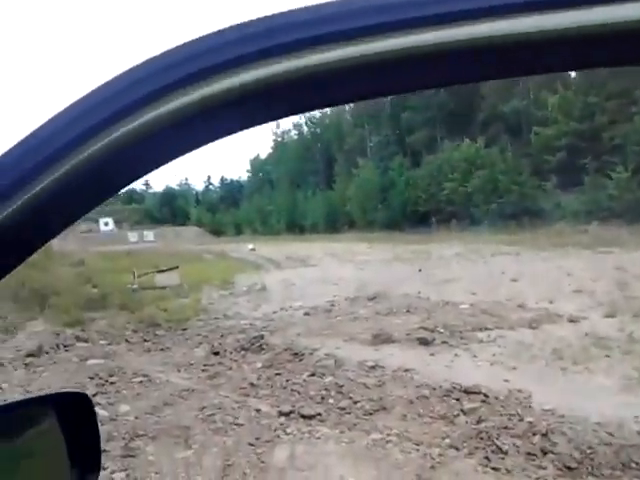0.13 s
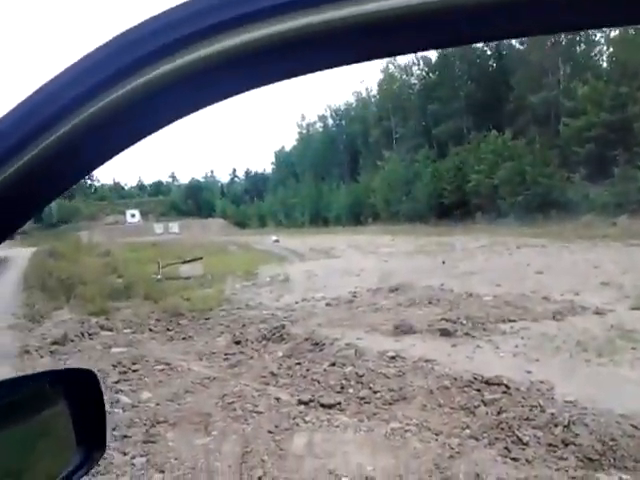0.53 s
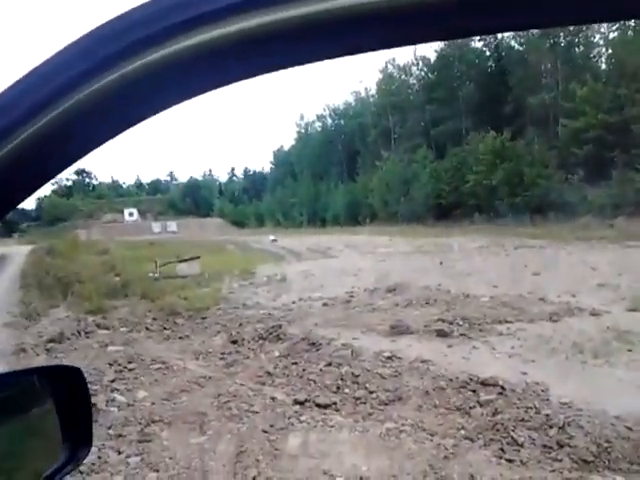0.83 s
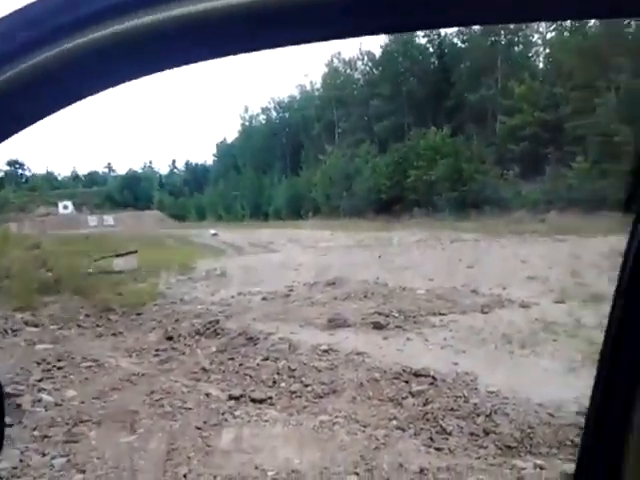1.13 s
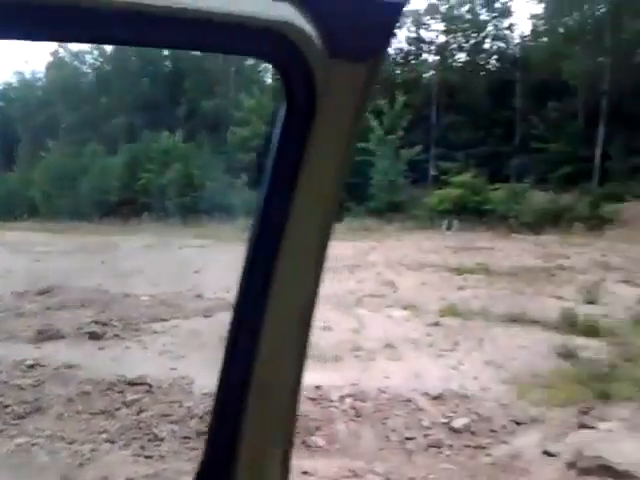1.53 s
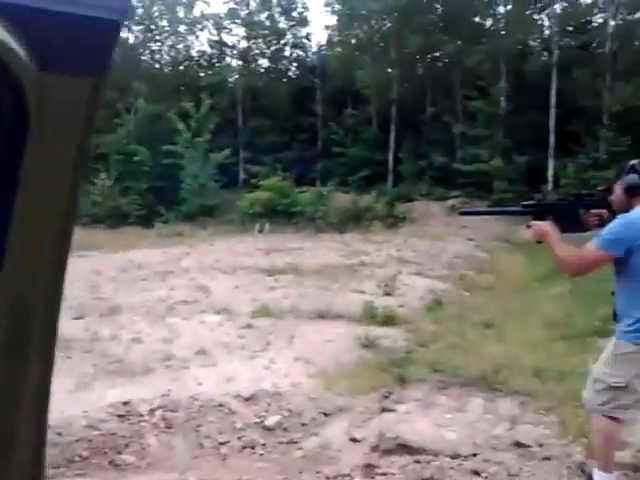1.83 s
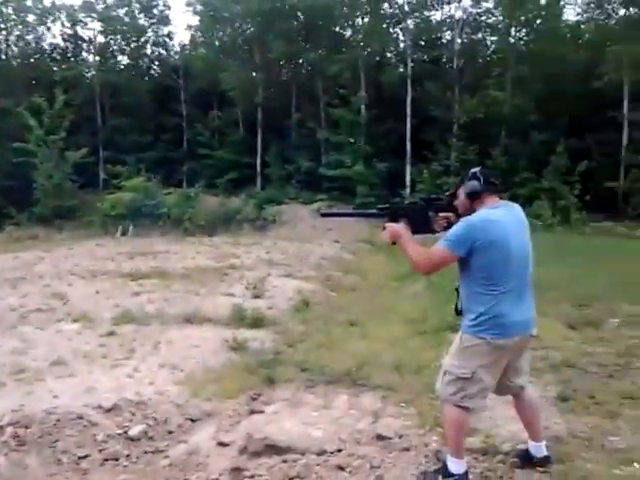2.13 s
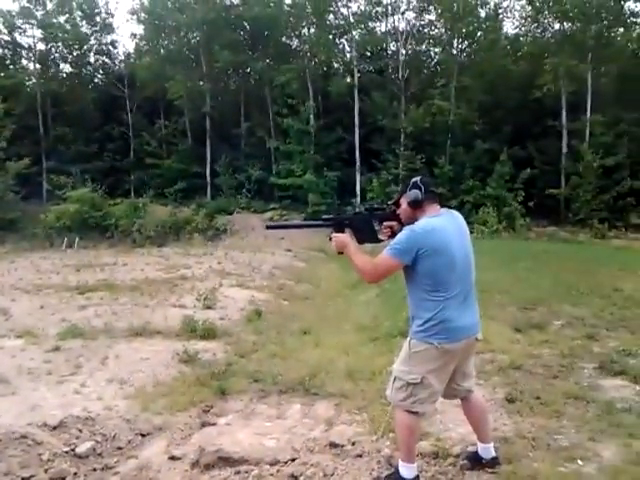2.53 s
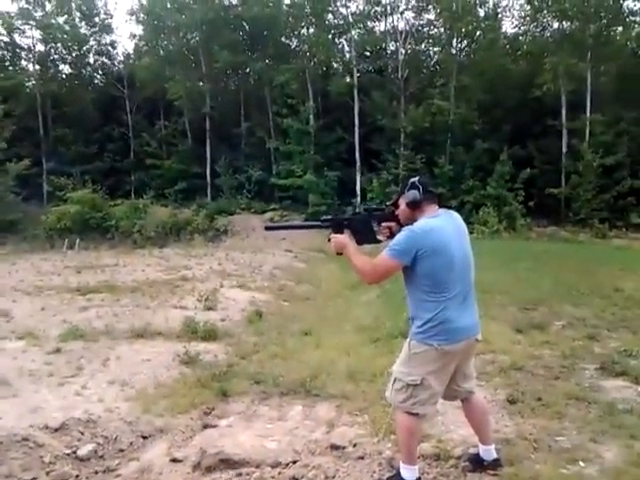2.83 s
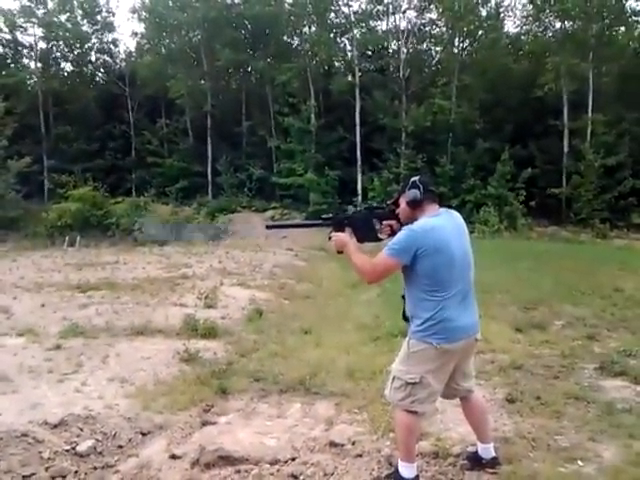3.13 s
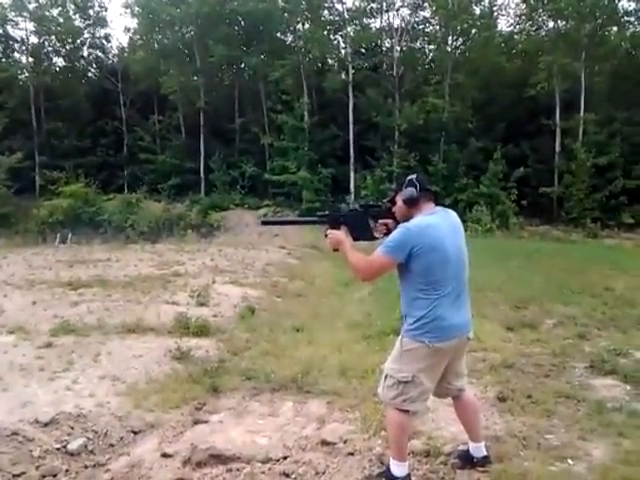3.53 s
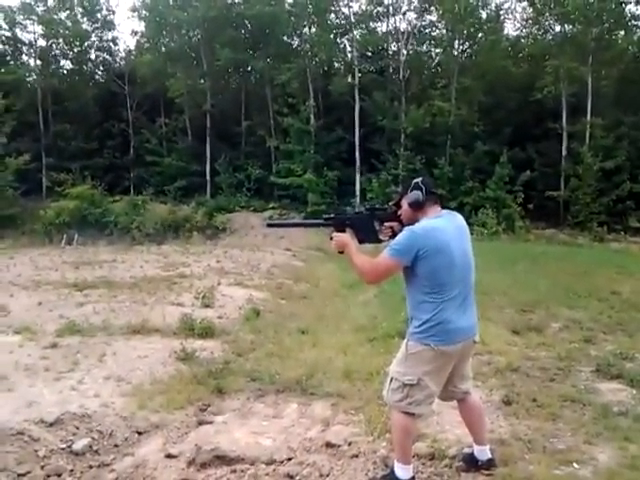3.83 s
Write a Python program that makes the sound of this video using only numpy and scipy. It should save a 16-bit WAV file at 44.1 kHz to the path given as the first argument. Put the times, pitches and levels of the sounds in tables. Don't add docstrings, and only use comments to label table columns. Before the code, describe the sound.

Rifle shots at an outdoor range ringed by forest, close to a small mono microphone. The tail of an earlier shot claps off trees and fades from 0 s. From about 0.4 to 1.8 s, faint plastic ticks, a sliding rub, soft bumps and cloth rustle over hiss. Clipped, metallic-ringing blasts hit at 2.0 and, strongest, 3.2 s, with clattering, rolling echoes. A very faint insect whistles near 1.8 and 3.0 s.

```python
import sys
import numpy as np
from scipy import signal
from scipy.fft import rfft, irfft
from scipy.io import wavfile
from scipy.ndimage import uniform_filter1d

SR = 44100
rng = np.random.default_rng(int(sys.argv[2]) if len(sys.argv) > 2 else 0)


def waveform_to_disk(signal):
    frames = np.transpose(np.atleast_2d(signal))
    scaled = np.clip(frames, -1, 1) * 32767
    samples = np.round(scaled).astype(np.int16)
    wavfile.write(sys.argv[1], SR, samples)


def field_ratio(decibels):
    return 10 ** (np.asarray(decibels, dtype=float) / 20)


N = 176400
ECHO_N = 2 * SR


def even(x):
    return x / np.sqrt(np.mean(x ** 2) + 1e-20)


def smooth_noise(shape, size):
    return even(uniform_filter1d(rng.standard_normal(shape), size=size))


def read(points, hz):
    f, value = np.transpose(points)
    return np.interp(np.log(hz + 1), np.log(f + 1), value)


def colour(x, points, tilt_db=0.):
    hz = np.fft.rfftfreq(len(x), 1 / SR)
    gain_db = read(points, hz) + tilt_db * np.log2(hz / 2000 + .01)
    return irfft(rfft(x) * field_ratio(gain_db), len(x))


def causal(x, points):
    log_gain = np.log(field_ratio(read(points, abs(np.fft.fftfreq(4096, 1 / SR)))))
    taps = np.fft.ifft(np.exp(np.conj(signal.hilbert(log_gain)))).real[:2048]
    return signal.oaconvolve(x, taps)[:len(x)]


def add(mix, s, sound):
    at = round(s * SR)
    sound = sound[max(-at, 0):]
    part = mix[max(at, 0):][:len(sound)]
    part += sound[:len(part)]


# [f/Hz, level/dB per Hz]
HISS_TONE = [(30, -11.5), (150, -10.5), (500, -7.5), (900, -16), (2000, -14), (4000, -18.5), (8000, -19),
             (16000, -18.5)]


def hiss():
    return field_ratio(-56.5) * even(colour(rng.standard_normal(N), HISS_TONE))


# [f/Hz, level/dB per Hz]
BLAST_TONE = [(18, -26.5), (30, -3.5), (436, -12.5), (777, -1.5), (1060, -8.5), (2220, 0.5), (5560, -4),
              (6510, -2.5), (15900, -14)]
# [f/Hz, level/dB, t60/s]
BARREL_MODES = [(288.4, 1.5, 0.062), (712.6, -1, 0.099), (871, -5.5, 0.12), (1166, -4, 0.12),
                (1925, -10, 0.23), (2500, -5.5, 0.076), (3432, -9.5, 0.05), (9400, -9, .09)]
# [f/Hz, level/dB, t60/s]
MAIN_MODE = (3424, -5, .24)


def blast(hold, ring_hz):
    roar_db, sag_db, roar_t60 = 12, -12, 0.072
    linger_db, linger_t60 = -29, 0.24
    push_db, push_s = -0.5, 0.0029
    t = np.arange(SR // 2) / SR

    after = np.maximum(t - hold, 0)
    sag = field_ratio(sag_db * np.minimum(t / hold, 1))
    collapse = field_ratio(-60 * after / roar_t60) + field_ratio(linger_db - 60 * after / linger_t60)
    roar = even(colour(rng.standard_normal(len(t)), BLAST_TONE)) * sag * collapse * field_ratio(roar_db)

    push = -field_ratio(push_db) * (1 - t / push_s) * np.exp(-t / push_s)

    ring = np.zeros(len(t))
    for hz, db, t60 in BARREL_MODES + [MAIN_MODE, (ring_hz, -3, .17)]:
        ring += field_ratio(db - 60 * t / t60) * np.sin(2 * np.pi * (hz * t + rng.random()))
    return (roar + push + ring) * np.minimum(t / .0008, 1) ** 2


# [delay/s, level/dB]
TRUNK_CLAPS = [(.0870, -11), (.0977, -4), (.0992, -3), (.1081, -13), (.1225, -2), (.1350, -7), (.1522, -4),
               (.1610, -10), (.1713, -7), (.1830, -9), (.1925, -7), (.1990, -11), (.2055, -12),
               (.2130, -12), (.2235, -11), (.2326, -7), (.2428, -10), (.2532, -13), (.2660, -14),
               (.2905, -14), (.3100, -15), (.3323, -14), (.3508, -14), (.3753, -14), (.3839, -14),
               (.545, -24)]
# [f/Hz, level/dB]
BARK_TONE = [(200, -30), (600, -9), (1000, -2), (1700, 1), (2600, -9), (3400, -3), (4600, -20),
             (16000, -60)]


def trunks():
    taps = np.zeros(ECHO_N)
    delay, db = np.transpose(TRUNK_CLAPS)
    taps[np.round(delay * SR).astype(int)] = field_ratio(db)
    claps = causal(taps, BARK_TONE)
    return claps / abs(claps).max()


def scatter(grain_db):
    size = field_ratio(grain_db * np.minimum(smooth_noise(ECHO_N, 110), 2.5))
    reflections = even(size * rng.standard_normal(ECHO_N))
    return signal.stft(reflections, SR, nperseg=512, noverlap=384)


# [f/Hz, level/dB per Hz]
WOOD_TONE = [(40, -41), (300, -18), (800, -5), (1600, -6), (3000, -5.5), (7400, -5), (11000, -15),
             (16000, -21.5)]
# [f/Hz, loss/dB after 1 s]
WOOD_FADE = [(60, 45), (300, 28.5), (900, 25), (1700, 31), (3400, 48.5), (4500, 61.5), (6200, 56),
             (12000, 105.5)]
# [f/Hz, share 0-1]
LIKENESS = [(1500, .95), (3000, .35), (5000, 0)]
# [f/Hz, level/dB]
BRUSH_BASS = [(2000, -6), (5000, 0)]


def forest(trees):
    edge_s, full_s, before_db = 0.037, 0.16, -10
    wood_db, fade_bend = -10.5, 0.76
    hz, t, leaves = scatter(0)
    wood, fade, same, brush = [read(points, hz)[:, None]
                               for points in (WOOD_TONE, WOOD_FADE, LIKENESS, BRUSH_BASS)]

    reach = np.clip((t - edge_s) / (full_s - edge_s), 0, 1)
    db = wood - fade * np.maximum(t - full_s, 0) ** fade_bend
    db = db + (before_db + brush) * (1 - np.sin(np.pi / 2 * reach))

    flat = np.sqrt(np.mean(field_ratio(wood) ** 2))
    echo = same * trees + np.sqrt(1 - same ** 2) * leaves
    echo = echo * field_ratio(db + wood_db) / flat
    return signal.istft(echo, SR, nperseg=512, noverlap=384)[1][:ECHO_N]


# [t/s, level/dB of the echo, overload hold/s, second ring f/Hz]
RIFLE_SHOTS = [
    (-.1110, 0, 0.036, 6500),
    (1.9788, -1, 0.038, 6500),
    (3.2087, 1.5, 0.046, 5920),
]


def shots(mix):
    trees, claps = scatter(2)[2], trunks()
    for s, db, hold, ring_hz in RIFLE_SHOTS:
        add(mix, s, field_ratio(db) * (forest(trees) + claps))
        add(mix, s, blast(hold, ring_hz))


# [f/Hz, level/dB per Hz]
SNAP_TONE = [(3000, -20), (7000, -16), (16000, -19.5)]
# [t/s, peak level/dB, f/Hz]
CASE_TICKS = [
    (.434, -44, 6000),
    (.660, -34, 6900),
    (.891, -33, 6900),
    (.9245, -50, 7060),
    (1.003, -49, 6500),
    (1.026, -45, 7250),
    (1.079, -48.5, 7540),
    (1.431, -50.5, 8200),
    (1.8153, -43, 7020),
    (2.975, -37, 11500),
]


def tick(s, db, hz):
    t = np.arange(0, .014, 1 / SR)
    snap = even(colour(rng.standard_normal(len(t)), SNAP_TONE)) * field_ratio(-60 * t / .016)
    ring = np.sin(2 * np.pi * hz * t) * field_ratio(-8 - 60 * t / .02)
    return s, field_ratio(db - 6.5) * (snap + ring)


# [f/Hz, level/dB per Hz]
DRAG_TONE = [(1200, -25), (2200, 5), (2900, -4.5), (3600, 0.5), (4400, -7), (5300, -3.5), (6800, -7),
             (10000, -25)]


def slide():
    return rub(start=.657, length=.62, db=-40, tilt_db=0, rise=.015, fade_db=-24.5, tone=DRAG_TONE)


# [t/s, level/dB, f/Hz]
FINGER_THUMPS = [
    (.90, -45, 233),
    (1.034, -41, 169),
    (1.50, -43, 195),
]


def thump(s, db, hz):
    t = np.arange(4000) / SR
    return s, field_ratio(db - 60 * t / 0.044) * np.sin(2 * np.pi * hz * t) * np.minimum(t / 0.0043, 1)


# [f/Hz, level/dB per Hz]
CLOTH_TONE = [(100, -12), (400, 0), (1000, -10.5), (3500, 5.5), (4500, -5), (6700, 1), (9000, -6),
              (16000, -24)]
# [t/s, length/s, level/dB, brightness/dB per octave, share of rise]
CLOTH_RUBS = [
    (1.297, .2, -54, -1, .08),
    (1.39, .2, -45, -1, .6),
    (1.60, .14, -57, -3, .4),
]


def rub(start, length, db, tilt_db, rise, fade_db=-10, tone=CLOTH_TONE):
    t = np.arange(0, 1, 1 / (length * SR))
    clumps = field_ratio(1.3 * smooth_noise(SR, 400)[:len(t)])
    grit = rng.standard_normal(len(t)) * clumps
    fade = field_ratio(fade_db * np.maximum(t - rise, 0) / (1 - rise))
    stroke = np.minimum(t / rise, 1) ** 2 * fade * np.minimum((1 - t) / .1, 1)
    return start, field_ratio(db) * stroke * even(colour(grit, tone, tilt_db))


# [t/s, length/s, level/dB, f/Hz, arch/Hz]
INSECT_CHIRPS = [
    (1.76, .2, -66, 7900, 213),
    (3.024, .12, -64, 8030, 1210),
    (3.15, 0.034, -74, 8860, 200),
]


def chirp(s, length, db, hz, arch_hz):
    t = np.arange(0, 1, 1 / (length * SR))
    fuzz = smooth_noise(SR, 60)[:len(t)]
    pitch = hz + arch_hz * np.sin(np.pi * t * .8)
    whistle = np.sin(2 * np.pi * np.cumsum(pitch) / SR)
    return s, field_ratio(db) * np.sqrt(np.sin(np.pi * t)) * fuzz * whistle


def scene():
    mix = hiss()
    shots(mix)
    add(mix, *slide())
    for source, rows in ((tick, CASE_TICKS), (thump, FINGER_THUMPS), (rub, CLOTH_RUBS), (chirp, INSECT_CHIRPS)):
        for row in rows:
            add(mix, *source(*row))
    return np.array([mix, mix])


def masked(x):
    from_hz, under_db, slope_db = 9000, -41, 12
    stops_db, ragged_db = -46, 2.5
    hz, t, z = signal.stft(x, SR, nperseg=2048, noverlap=1536)
    bands = (abs(z[:1024]) ** 2).reshape(32, 32, -1).sum(axis=1)
    db = 10 * np.log10(uniform_filter1d(bands, size=3, axis=1) + 1e-20)
    centre, top_db = hz[16:1024:32, None], db.max(axis=0)

    ragged = ragged_db * even(uniform_filter1d(rng.standard_normal(db.shape), size=4, axis=1))
    limit_db = top_db + ragged / 2 + under_db + slope_db * np.log2(centre / from_hz)
    drop = (centre > from_hz) & (db < limit_db) & (top_db > stops_db + ragged)
    keep = np.vstack([np.repeat(~drop, 32, axis=0), ~drop[-1:]])
    return signal.istft(z * keep, SR, nperseg=2048, noverlap=1536)[1][:N]


def roll_off(x):
    return signal.sosfilt(signal.butter(12, 16030, fs=SR, output="sos"), x)


# [f/Hz, level/dB]
MIC_PORT = [(1650, 2), (1850, -4), (2300, 1), (2900, -5), (3500, 1), (4300, -5), (8800, 1), (9500, -5)]


def record(dry):
    clipped = np.clip(causal(dry[0], MIC_PORT), -1, 1)
    mono = masked(clipped)
    return roll_off(np.array([mono, mono]))


dry = scene()
out = record(dry)
waveform_to_disk(out)
```